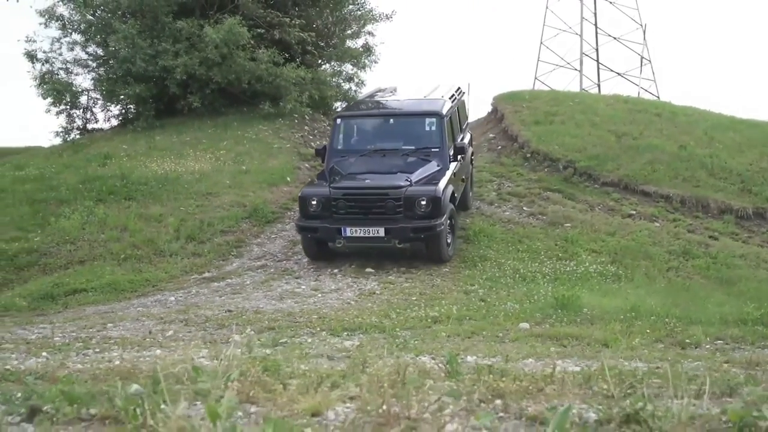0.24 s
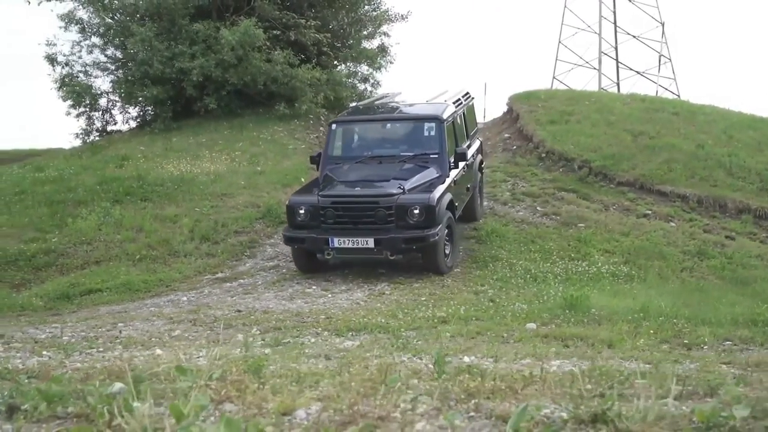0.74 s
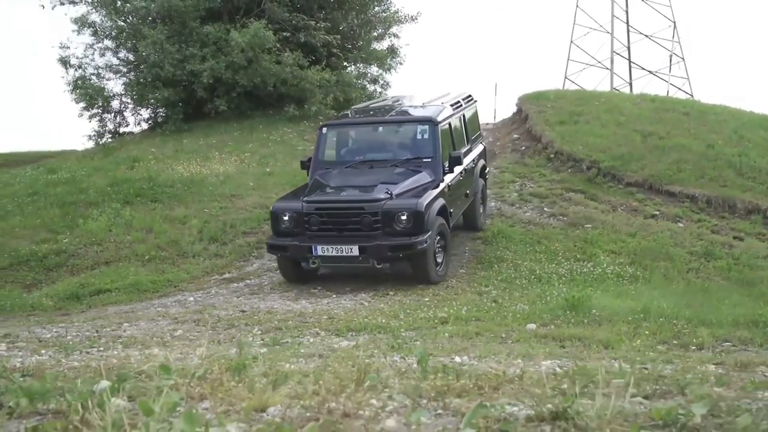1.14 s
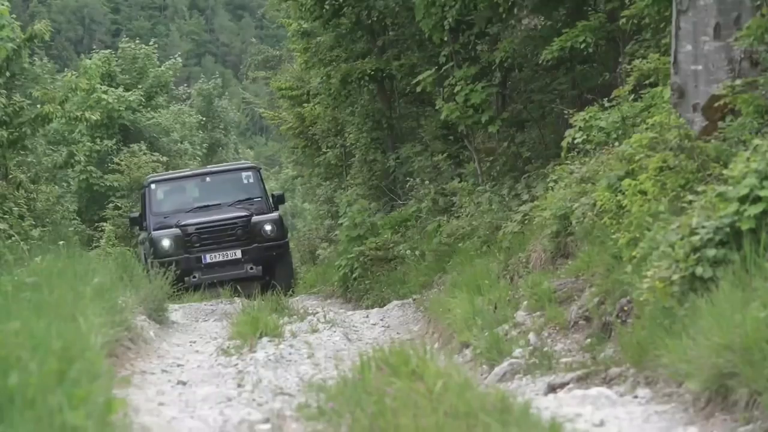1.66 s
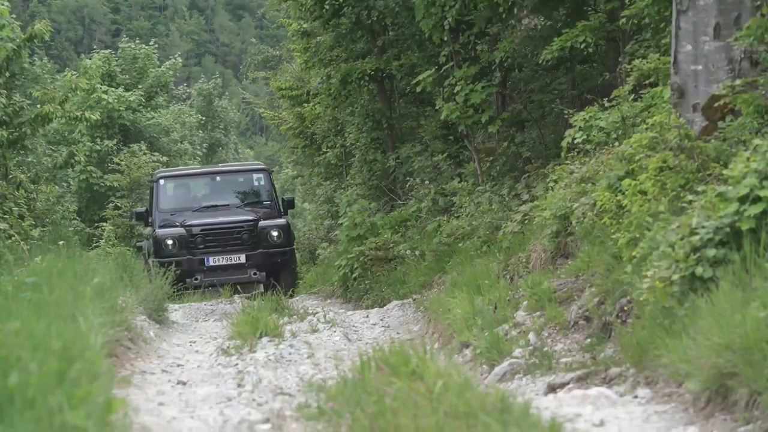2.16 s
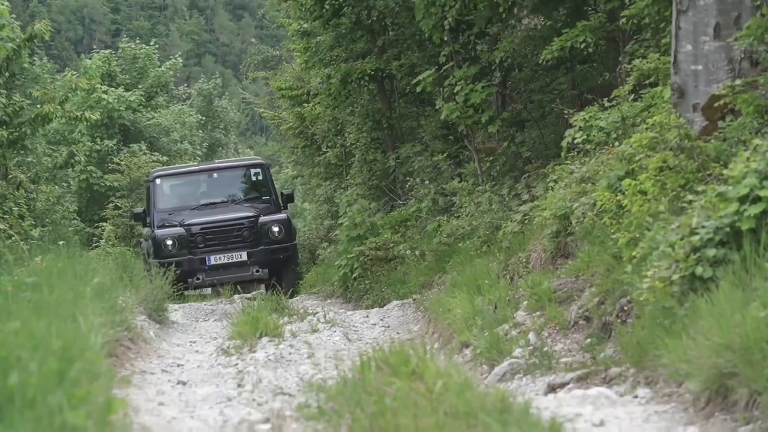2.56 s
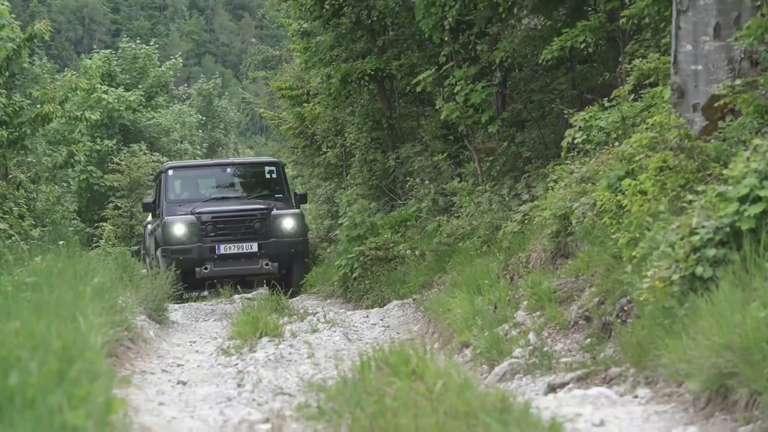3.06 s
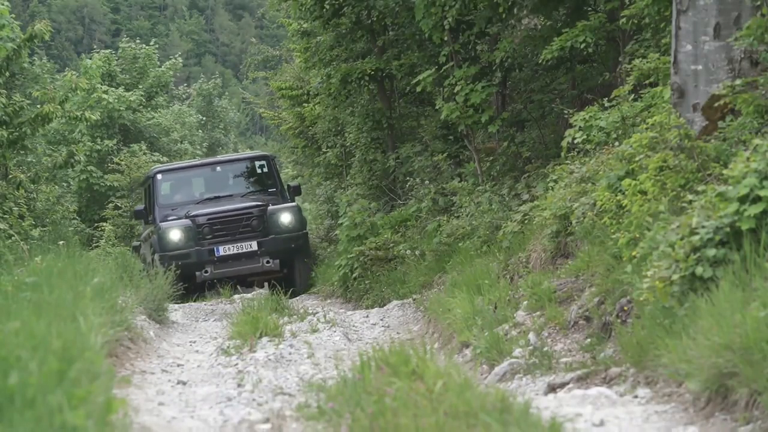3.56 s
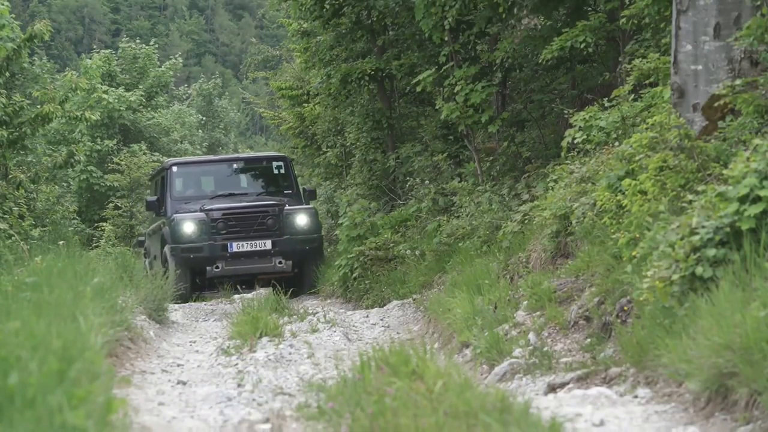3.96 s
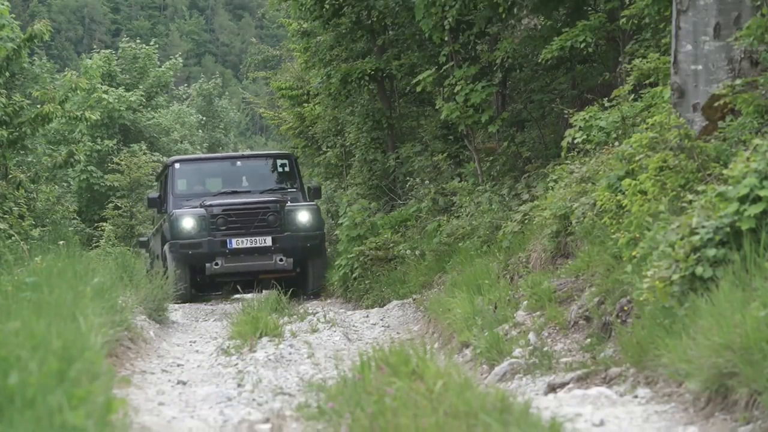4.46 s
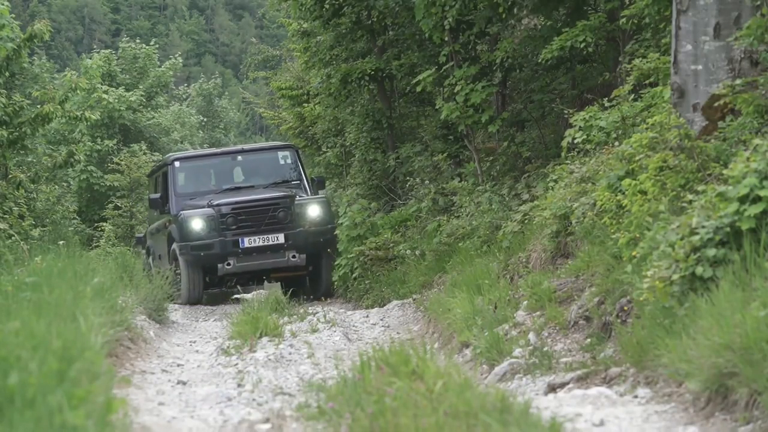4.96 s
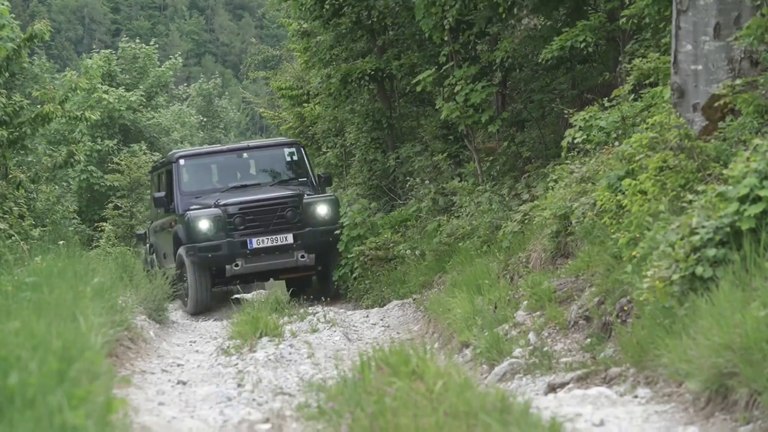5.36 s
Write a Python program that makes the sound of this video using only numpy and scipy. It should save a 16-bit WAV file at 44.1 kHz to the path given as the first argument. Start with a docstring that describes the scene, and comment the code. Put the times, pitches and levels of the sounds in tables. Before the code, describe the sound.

From 0 to 1.5 s a four-wheel drive is quiet and distant on an open grassy slope: a low, slightly shaky engine hum, dipping near 0.5 s, with gently fading roar, soft hiss and an almost inaudible thin whine. A hard cut leaves silence until 1.6 s. Then the vehicle is suddenly nearer and louder on a stony track: a slow idling throb with deep rumble and clatter, growing slightly, and a hollow fan roar and drone that slowly ease. Tyres grind continuously on gravel. Low booms come at about 1.9, 2.2, 2.5, 3.1 to 3.7, 4.6, 4.9 and 5.3 s. Sharp bright stone snaps hit at 2.5, 3.2 to 3.4, 4.1 and 4.2 s; duller knocks at 2.7 to 3.0, 4.75, 5.1 and 5.6 s, with a very short scatter from bank and trees. Faint high chirring appears until 3 s and again from 4.3 to 5.4 s. It ends mid-drive.

```python
"""A grassy slope, then a stony track: a six-cylinder four-wheel drive heard in two shots with a short silence between.
On the slope it is far off: tones tied to the engine's turning make a hum, and shaped noise makes a roar and hiss.
On the track it is near: engine tones throb, fan tones drone, and bursts of noise make the tyres grind on gravel.
Low tones thump, short ringing tones snap and knock like stones, and narrow whistles chirr faintly behind."""
import sys
import numpy as np
from scipy import signal
from scipy.fft import rfft, irfft
from scipy.io import wavfile

SR = 44100
rng = np.random.default_rng(int(sys.argv[2]) if len(sys.argv) > 2 else 0)


def transcribe(signal):
    """Save signal, clipped to [-1, 1], as a 16-bit WAV file at the path in sys.argv[1]."""
    frames = np.atleast_2d(signal).T
    limited = np.clip(frames, -1, 1)
    pcm = np.round(limited * 32767).astype(np.int16)
    wavfile.write(sys.argv[1], SR, pcm)


N = 247401
TIME = np.arange(N) / SR  # seconds
SLOPE_END, TRACK_START = 1.527, 1.628  # seconds
TOP_HZ = 15780  # the whole sound is cut off around here

# Faint high chirring. Each row: start and end in seconds, start and end pitch in Hz, width in Hz,
# level in dB before the opening boost, pulses a second, pulse depth from 0 to 1.
CHIRRS = [(1.55, 2.995, 5640, 5900, 300, -67, 7.6, 0.4), (1.595, 3.049, 6260, 7020, 260, -71, 7.5, .5),
          (4.3, 4.65, 7950, 7840, 130, -74, 9.4, .6), (4.503, 5.07, 12210, 12080, 110, -77, 10.7, .9),
          (4.795, 5.15, 3295, 3250, 150, -63, 10, .3), (4.897, 5.393, 8140, 8500, 260, -71, 13, 0.4)]

# Tones of the far engine. Each row: multiple of the crank speed, level in dB within the hum.
SLOPE_TONES = [(1, -9), (2, -15.5), (3, -2), (5, -12.5), (7, -18.5), (10.5, -23)]
# Tone colour of the far roar and hiss. Each row: frequency in Hz, relative strength in dB per Hz.
SLOPE_ROAR_COLOUR = [(12, -17), (30, 7.5), (60, 6), (120, 5), (250, -2.5), (340, 3), (420, 0.5), (560, 0.5),
                     (650, 4), (720, -1), (850, -1.5), (1000, -5.5), (1500, -9.5), (2500, -31)]
SLOPE_HISS_COLOUR = [(700, -24), (1500, -8), (2000, -1), (2700, -1.5), (3400, -5.5), (4300, -13.5),
                     (5000, -14), (6000, -17.5), (8000, -20), (15500, -21)]
# The firing rate starts higher by the extra, then settles.
SLOPE_FIRING_HZ, EXTRA_FIRING_HZ, SETTLE_S = 104, 4, 0.051
HUM_DB = -55.5
# The hum dips once. The row: time of the lowest point in seconds, depth in dB, length in seconds.
HUM_DIP = (0.52, 7.8, 0.12)
ROAR_DB, ROAR_DB_PER_S = -55, -1.5
HISS_DB, HISS_DB_PER_S = -62.5, -2

# Small stones that snap. Each row: start in seconds, peak level in dB, ring in Hz.
SNAPS = [(2.4743, -21.5, 8900), (2.4795, -42, 9000), (2.5387, -32, 8100), (2.5432, -40, 8500),
         (3.216, -35, 10500), (3.286, -38, 10400), (3.2926, -32, 10200), (3.3006, -38, 9400),
         (3.3025, -34, 10000), (3.3121, -25, 9060), (3.3496, -32.5, 6200), (3.3616, -39, 7000),
         (4.068, -24, 7450), (4.213, -33, 9810)]
# Larger stones that knock and crush. Each row: start in seconds, peak level in dB, lowest ring in Hz,
# length of the scrape in seconds, grit level in dB before the peak is set.
KNOCKS = [(2.6964, -42, 2195, 0.0015, -16), (2.805, -37, 2500, 0.0022, -8), (2.817, -39.5, 2400, 0.034, 0),
          (2.8754, -40, 2480, 0.0017, 1), (2.9194, -30.5, 3330, 0.0014, -21),
          (2.9816, -30, 3350, .0015, -23), (4.755, -32.5, 1054, 0.0061, -30), (5.083, -41, 2905, 0.0044, 3),
          (5.1375, -36, 3250, 0.0025, -10), (5.1548, -31.5, 3280, .004, -4),
          (5.1637, -28.5, 3230, 0.0053, -6), (5.58, -28, 1380, 0.003, -34),
          (5.596, -31.5, 1430, 0.004, -36)]
# How a knocked stone rings. Each row: multiple of its lowest ring, relative level in dB, width in Hz.
STONE_RINGS = [(1, 2.5, 377), (1.32, -8, 480), (2.6, -24, 301), (3.67, -34, 400)]
STONE_DULL_HZ = 4480  # a larger stone's ring is dull above this
# A tyre drops off a stone and the body booms.
# Each row: time of the loudest point in seconds, level in dB, pitch in Hz, length in seconds.
THUMPS = [(1.883, -36, 59.6, 0.042), (2.2, -27.5, 58.7, 0.02), (2.52, -32, 58, 0.05),
          (3.103, -31, 62.6, 0.036), (3.266, -33.5, 65.9, 0.028), (3.436, -31.5, 59, 0.05),
          (3.686, -30, 50.27, 0.065), (4.609, -34, 59, 0.05), (4.874, -31.5, 60.6, 0.04),
          (5.266, -38, 62.4, 0.03)]

# Tone colour of the gravel. Each row: frequency in Hz, relative strength in dB per Hz.
GRAVEL_COLOUR = [(1200, -7.5), (2500, 10.5), (4000, 5), (5000, 1.5), (6200, 0), (7400, -4), (10000, -4),
                 (12000, -10.5), (15500, -28)]
# Gravel under the tyres, before its random swells. Each row: time in seconds, level in dB.
GRAVEL_LEVEL = [(1.65, -53), (2.4, -52.5), (2.88, -51), (3.1, -51.5), (3.35, -52), (4.1, -51.5),
                (4.8, -53.5), (5.6, -53)]

# Tone colour of the fan's roar. Each row: frequency in Hz, relative strength in dB per Hz.
FAN_COLOUR = [(100, -3.5), (220, -6.5), (280, 1), (380, -3.5), (460, 1), (560, -1.5), (680, -1.5),
              (820, -1.5), (950, -12.5), (1300, -11), (2500, -32)]
FAN_HZ = 173.3  # the lower blade tone, before it wavers
# Levels where the track begins, and how the fan's sounds fade in dB each second.
FAN_DB, FAN_DB_PER_S = -41, -0.73
HOLLOW_DB, HOLLOW_DB_PER_S = -47.5, -3.0  # a hollow note in the roar
DRONE_DB, DRONE_DB_PER_S = -44.5, -2.0  # the upper blade tone
# The lower blade tone swells in, then holds.
FAN_HUM_DB, FAN_HUM_SWELL_S = -49, 0.51

# The idling engine picks up a little. Each row: time in seconds, firing rate in Hz.
IDLE_FIRING = [(1.65, 35.84), (2.5, 35.8), (2.7, 36.8), (5.3, 36.83), (5.6, 36.07)]
# Tones of the idling engine. Each row: multiple of the crank speed, level in dB within the throb.
IDLE_TONES = [(1, 3), (3, -3.5), (4, -22), (5, -9.5), (6, -1.5), (9, -10.5), (12, -14.5), (24, -26),
              (36, -14)]
# Tone colour of rumble and clatter. Each row: frequency in Hz, relative strength in dB per Hz.
RUMBLE_COLOUR = [(6, 9), (11, 10.5), (20, 2.5), (30, 2), (58, 0.5), (85, 1.5), (110, -7), (150, -2.5),
                 (200, -9.5), (260, -39), (500, -45)]
CLATTER_COLOUR = [(500, -20), (900, -1), (1200, 0), (1650, 0), (1850, -5), (2300, -6.5), (2700, -12.5),
                  (3300, -13), (4300, -16), (5200, -22), (9000, -25)]
# The low rumble. Each row: time in seconds, level in dB.
RUMBLE_LEVEL = [(1.65, -44), (2.05, -39), (2.9, -40.5), (3.7, -40.5), (4.1, -42.5), (4.9, -40),
                (5.6, -39.5)]
# Levels where the track begins, and how they rise in dB each second as the vehicle nears.
THROB_DB, THROB_DB_PER_S = -47.5, 0.46
CLATTER_DB, CLATTER_DB_PER_S = -46.5, 0.31


def amp(db):
    """Turns decibels into a plain multiplier."""
    return 10 ** (np.asarray(db) / 20)


def drift(db, db_per_s, start):
    """A loudness multiplier whose decibels change steadily, counted from the start time."""
    return amp(db + db_per_s * (TIME - start))


def unit(x):
    """Scales a sound to an average strength (rms) of one."""
    return x / np.sqrt(np.mean(x ** 2) + 1e-20)


def curves(rows):
    """Joins each column of a table by straight lines in time."""
    seconds, *columns = np.transpose(rows)
    return [np.interp(TIME, seconds, column) for column in columns]


def noise():
    """White noise for the whole scene."""
    return rng.standard_normal(N)


def colour(x, spectrum):
    """Reshapes the strength of each frequency in x, then scales it to unit rms."""
    hz, db = np.transpose(spectrum)
    bins = np.fft.rfftfreq(N, 1 / SR)
    # Nothing below 4 Hz, and a fade beyond the last row.
    edges = (bins > 4) / (1 + (bins / (1.5 * hz[-1])) ** 4)
    shape_db = np.interp(np.log(bins + 1), np.log(hz + 1), db)
    return unit(irfft(rfft(x) * edges * amp(shape_db), N))


def wander(rate_hz):
    """Random drifting of unit rms, with changes faster than the rate faded out."""
    bins = np.fft.rfftfreq(N, 1 / SR)
    return unit(irfft(rfft(noise()) / (1 + (bins / rate_hz) ** 4), N))


def phase(hz):
    """Adds up a pitch over time into a running angle, from a random start."""
    return 2 * np.pi * (np.cumsum(hz) / SR + rng.random())


def ring(x, hz, width_hz):
    """One resonance: x sets it ringing at one pitch; a narrower width rings longer."""
    b, a = signal.iirpeak(hz, hz / width_hz, SR)
    return signal.lfilter(b, a, x)


def bright(x):
    """Keeps the treble band in which stones crack."""
    band = signal.butter(3, [5300, 12000], "band", fs=SR, output="sos")
    return signal.sosfilt(band, x)


def dull(x):
    """Rounds off the treble of a stone's ring."""
    lowpass = signal.butter(2, STONE_DULL_HZ, fs=SR, output="sos")
    return signal.sosfilt(lowpass, x)


def add(mix, start, sound):
    """Places a sound in the mix at its start time, trimmed to fit."""
    part = mix[round(start * SR):][:len(sound)]
    part += sound[:len(part)]


def grains(per_s, spread_db):
    """A random train of tiny impacts, a few much larger than the rest."""
    size = amp(spread_db * np.minimum(rng.exponential(1, N), 5))
    push_or_pull = rng.choice([-1, 1], N)
    happens = rng.random(N) < per_s / SR
    return unit(size * push_or_pull * happens)


def exhaust(firing_hz, tones, unsteady):
    """Tones at multiples of the crank speed, one turn in three firings; each wavers in strength."""
    crank = phase(firing_hz / 3)
    out = np.zeros(N)
    for multiple, db in tones:
        tone = np.sqrt(2) * np.cos(multiple * crank + 2 * np.pi * rng.random())
        out += amp(db) * tone * (1 + unsteady * wander(6.9))
    return out


def chirring(fade_db=4):
    """Narrow, fuzzy whistles that pulse unevenly and fade as they go."""
    out = np.zeros(N)
    for start, end, from_hz, to_hz, width_hz, db, pulses, depth in CHIRRS:
        along = np.clip((TIME - start) / (end - start), 0, 1)
        turn = phase(from_hz + (to_hz - from_hz) * along)
        # Two random strengths spread the pitch into a narrow band.
        whistle = wander(width_hz / 2) * np.sin(turn) + wander(width_hz / 2) * np.cos(turn)
        pulse = 1 - depth * np.cos(2 * np.pi * pulses * (TIME - start) + 0.7 * wander(5))
        soft_ends = np.minimum(1, 20 * along * (1 - along))
        out += amp(db + fade_db * (1.0 - along)) * whistle * pulse * soft_ends
    return out


def trees(x, t60=0.13):
    """The bank and trees scatter x into a short tail that falls 60 dB in t60 seconds."""
    t = np.arange(SR // 3) / SR
    tail = rng.standard_normal(len(t)) * np.exp(-np.log(1000) * t / t60)
    return signal.fftconvolve(x, tail / np.linalg.norm(tail))[:N]


def far_vehicle():
    """The engine holds the vehicle back: a hum, an ebbing roar and hiss, and a thin warbling whine."""
    firing_hz = SLOPE_FIRING_HZ + EXTRA_FIRING_HZ * np.exp(-TIME / SETTLE_S)
    shaky_firing_hz = firing_hz * (1 + 0.0071 * wander(13))
    dip_s, dip_db, dip_length = HUM_DIP
    hum_db = HUM_DB - dip_db * np.exp(-((TIME - dip_s) / dip_length) ** 2)
    hum = amp(hum_db) * exhaust(shaky_firing_hz, SLOPE_TONES, unsteady=0.18)
    roar = drift(ROAR_DB, ROAR_DB_PER_S, 0) * colour(noise(), SLOPE_ROAR_COLOUR)
    hiss = drift(HISS_DB, HISS_DB_PER_S, 0) * colour(noise(), SLOPE_HISS_COLOUR)
    warble_hz = 90 * np.sin(phase(19 + 7 * wander(11))) + 115 * wander(200)
    whine = amp(-78.5) * np.sin(phase(9790 + warble_hz))
    return hum + roar + hiss + whine


def snaps(decay_s=0.00038, overtone=1.6, overtone_db=-10, crack_db=1):
    """A pinched stone gives a sharp crack and rings for a few cycles."""
    out, t = np.zeros(N), np.arange(SR // 50) / SR
    for start, db, hz in SNAPS:
        turn = 2 * np.pi * hz * t
        tone = np.sin(turn) + amp(overtone_db) * np.sin(overtone * turn)
        crack = rng.standard_normal(len(t)) * np.exp(-t / 0.00023)
        snap = bright(tone * np.exp(-t / decay_s) + amp(crack_db) * crack)
        add(out, start, amp(db) * snap / abs(snap).max())
    return out


def knocks(blow=2.8):
    """A blow and a short scrape ring a larger stone and shed a burst of grit."""
    out, t = np.zeros(N), np.arange(SR // 8) / SR
    for start, db, hz, length, grit_db in KNOCKS:
        scrape, grit = rng.standard_normal((2, len(t))) * np.exp(-t / length)
        push = scrape + blow * (t == 0)
        body = np.zeros(len(t))
        for multiple, ring_db, width_hz in STONE_RINGS:
            body += amp(ring_db) * unit(ring(push, multiple * hz, width_hz))
        knock = dull(body) + amp(grit_db) * unit(bright(grit))
        add(out, start, amp(db) * knock / abs(knock).max())
    return out


def thumps():
    """Each drop of a wheel swells and dies as a low boom."""
    out = np.zeros(N)
    for middle, db, hz, length in THUMPS:
        swell = np.exp(-((TIME - middle) / length) ** 2)
        boom = np.cos(2 * np.pi * (hz * (TIME - middle) + rng.random()))
        out += amp(db) * swell * boom
    return out


def gravel(swell_db=0.5):
    """The treads grind small stones: clumps of tiny impacts over noise, swelling and easing."""
    gravel_db, = curves(GRAVEL_LEVEL)
    crunch = grains(per_s=5000, spread_db=2.5) * amp(2.0 * wander(25))
    grinding = colour(crunch + 1.3 * noise(), GRAVEL_COLOUR)
    return amp(gravel_db + swell_db * wander(3.3)) * grinding


def fan():
    """The cooling fan: a fluttering roar with a hollow note, and two blade tones an octave apart."""
    flutter = amp(0.52 * wander(33))
    roar = drift(FAN_DB, FAN_DB_PER_S, TRACK_START) * colour(noise() * flutter, FAN_COLOUR)
    hollow_note = unit(ring(ring(noise(), 614, 123), 653, 220))
    hollow = drift(HOLLOW_DB, HOLLOW_DB_PER_S, TRACK_START) * hollow_note
    blades = phase(FAN_HZ * (1 + 0.00393 * wander(6.2)))
    swell = 1 - np.exp(-np.maximum(TIME - TRACK_START, 0) / FAN_HUM_SWELL_S)
    hum = amp(FAN_HUM_DB) * swell * np.sin(blades)
    drone = drift(DRONE_DB, DRONE_DB_PER_S, TRACK_START) * np.sin(2 * blades)
    return roar + hollow + hum + drone


def near_engine(clatter_waver_db=0.7):
    """The idling engine: throbbing exhaust tones, low rumble, and clatter pulsing at the firing rate."""
    firing_hz, = curves(IDLE_FIRING)
    rumble_db, = curves(RUMBLE_LEVEL)
    throb = drift(THROB_DB, THROB_DB_PER_S, TRACK_START) * exhaust(firing_hz, IDLE_TONES, unsteady=0.54)
    rumble = amp(rumble_db) * colour(noise(), RUMBLE_COLOUR)
    strokes = 1 + 0.2 * np.cos(phase(firing_hz))
    rattle = colour(strokes * grains(per_s=6000, spread_db=2.0), CLATTER_COLOUR)
    waver = amp(clatter_waver_db * wander(5))
    clatter = drift(CLATTER_DB, CLATTER_DB_PER_S, TRACK_START) * rattle * waver
    return throb + rumble + clatter


def scene():
    """The far shot, a moment of silence, then the near shot."""
    stones = snaps() + knocks()
    scattered = amp(-11.5) * trees(stones)
    track = chirring() + scattered + stones + thumps() + gravel() + fan() + near_engine()
    far_shot = far_vehicle() * (TIME < SLOPE_END)
    near_shot = track * (TIME >= TRACK_START)
    return (far_shot + near_shot)[None]


def record(dry):
    """The recorder's band limit: a steep filter removes the highest treble."""
    lowpass = signal.firwin(511, TOP_HZ, window=("kaiser", 9), fs=SR)
    return signal.oaconvolve(dry, lowpass[None], "same")


dry = scene()
out = record(dry)
transcribe(out)
```